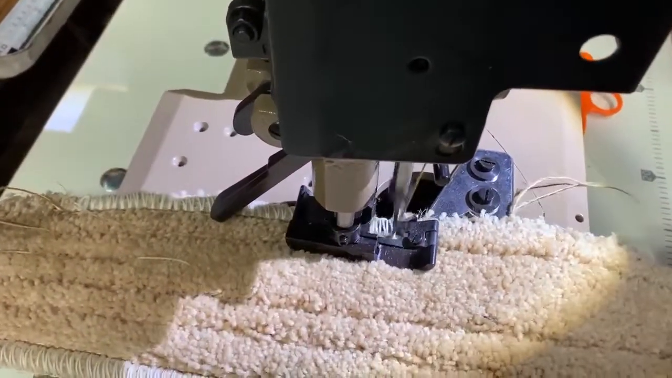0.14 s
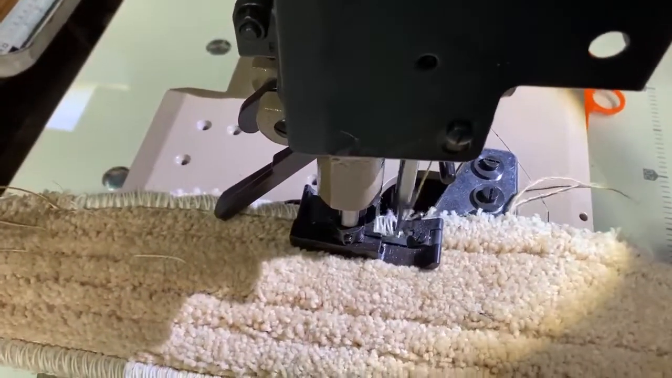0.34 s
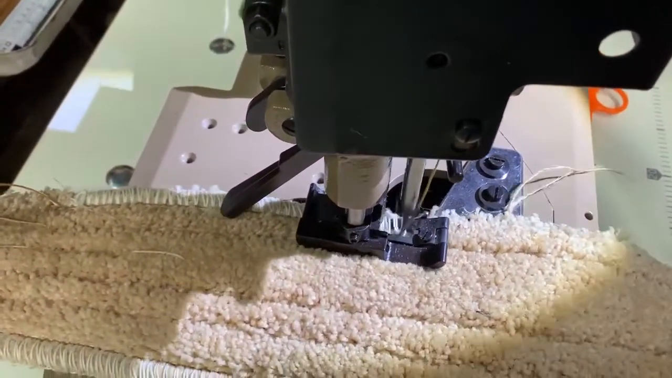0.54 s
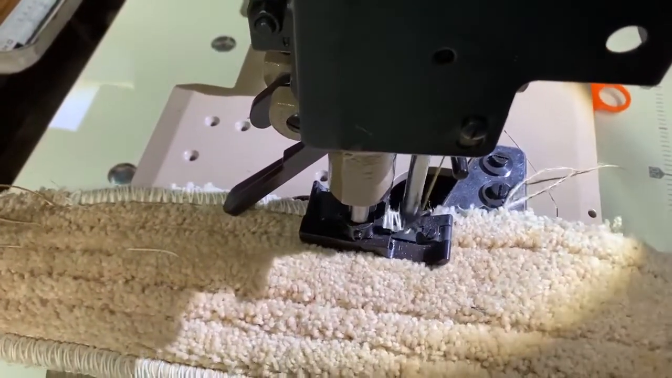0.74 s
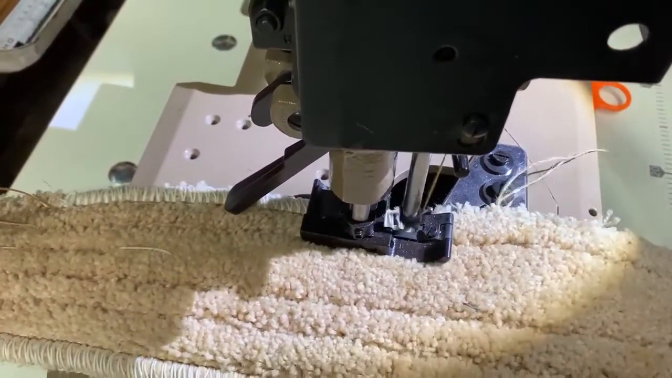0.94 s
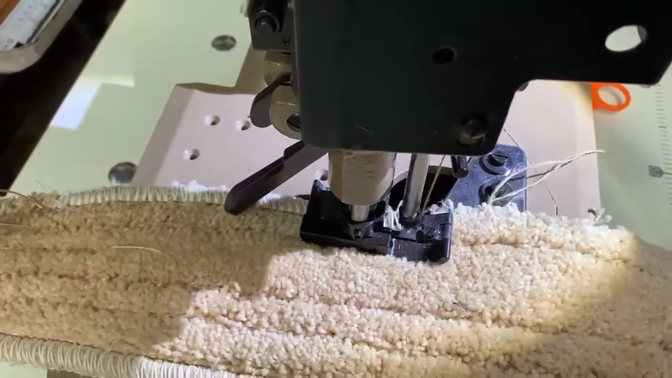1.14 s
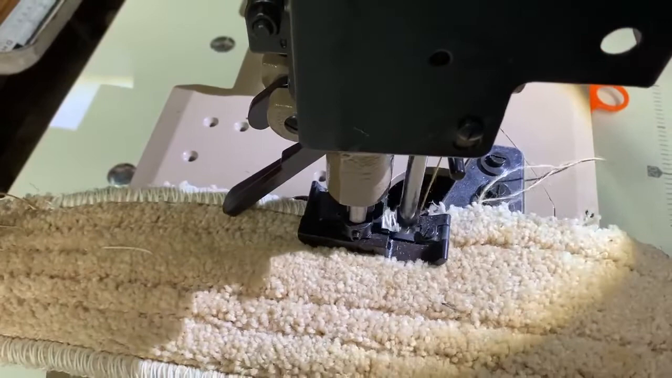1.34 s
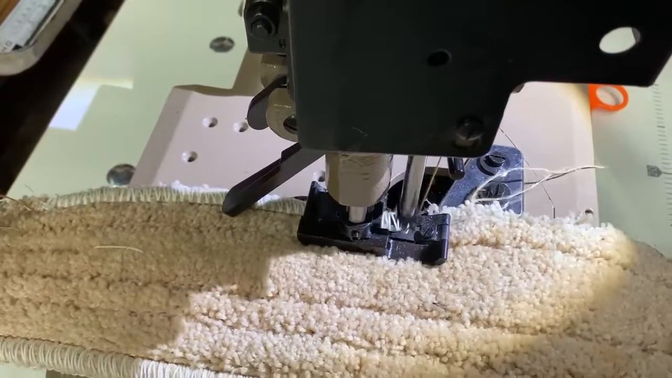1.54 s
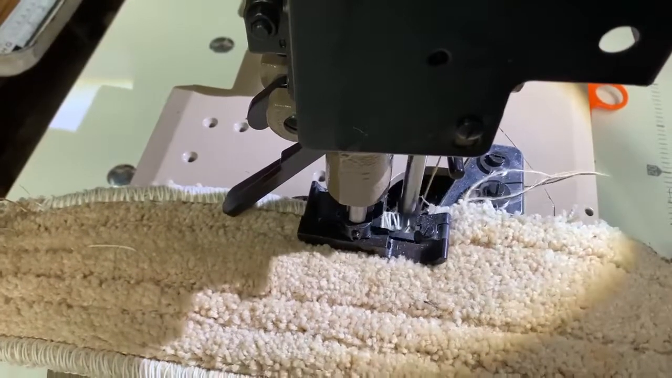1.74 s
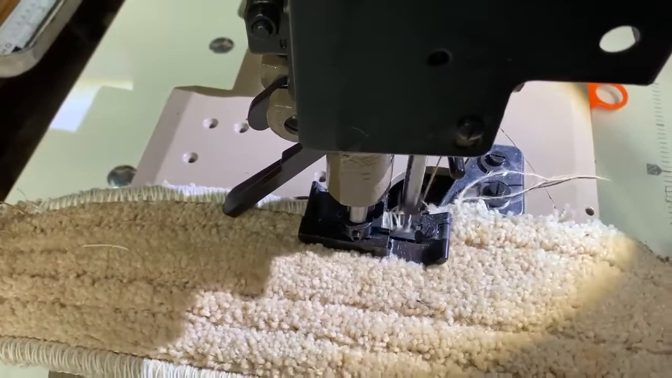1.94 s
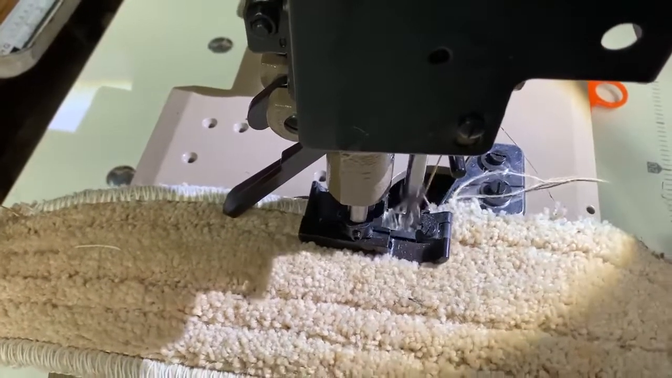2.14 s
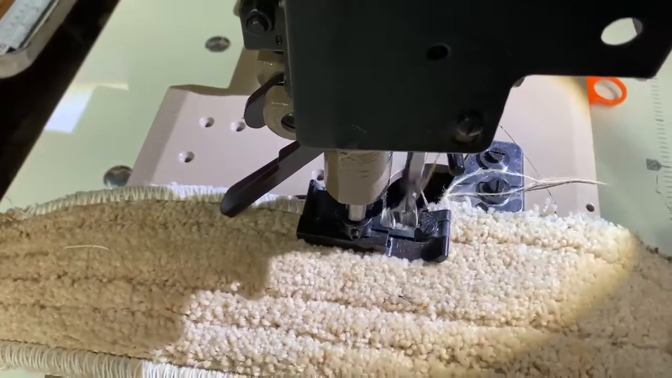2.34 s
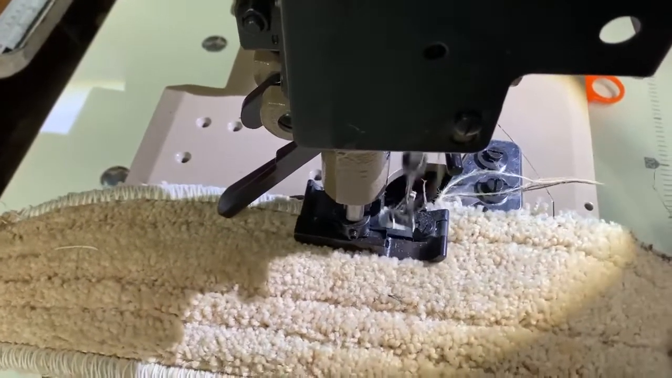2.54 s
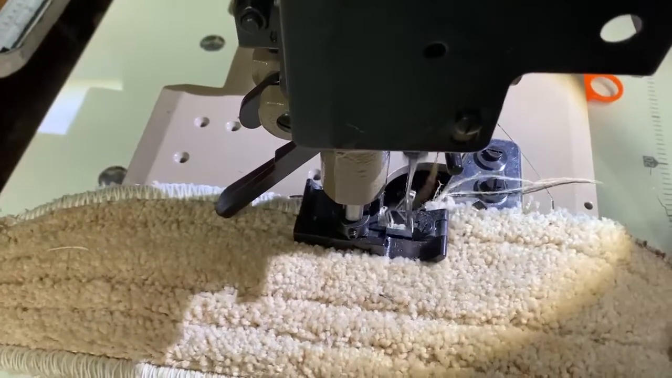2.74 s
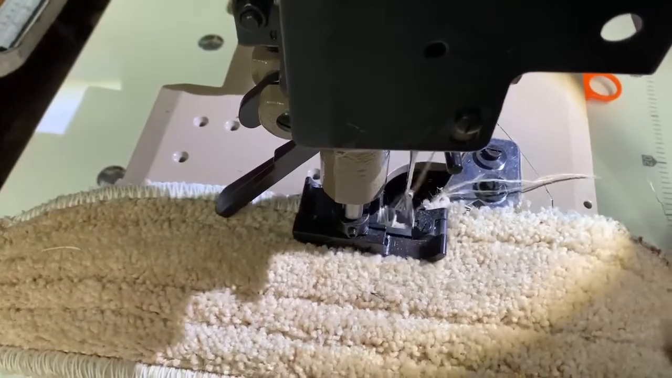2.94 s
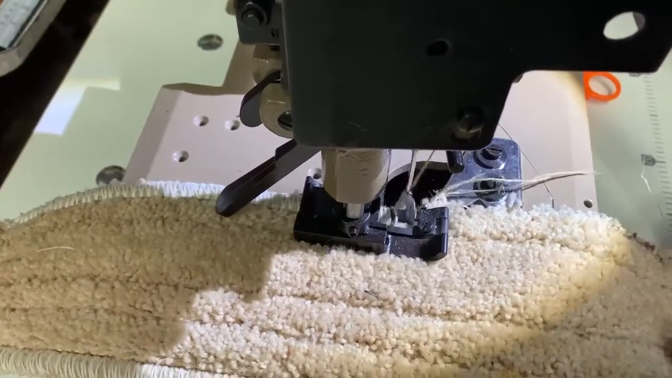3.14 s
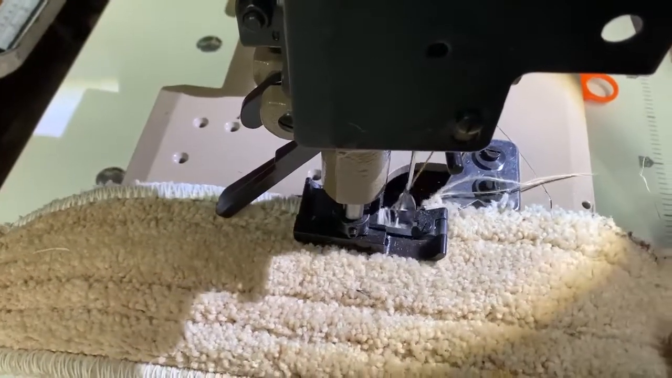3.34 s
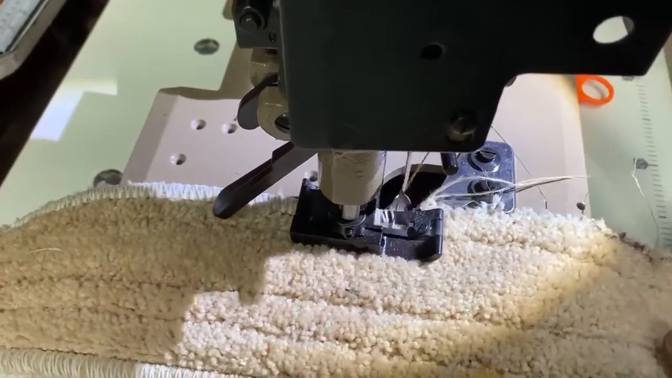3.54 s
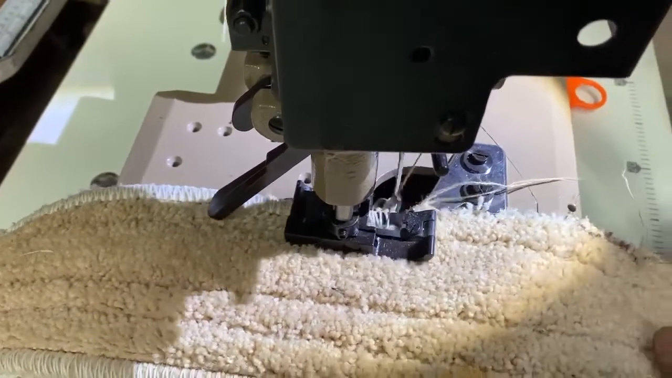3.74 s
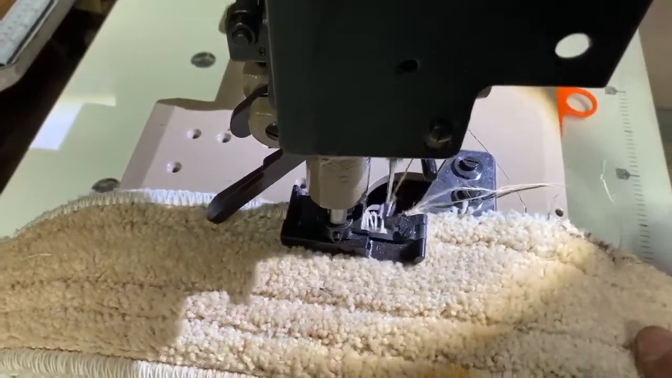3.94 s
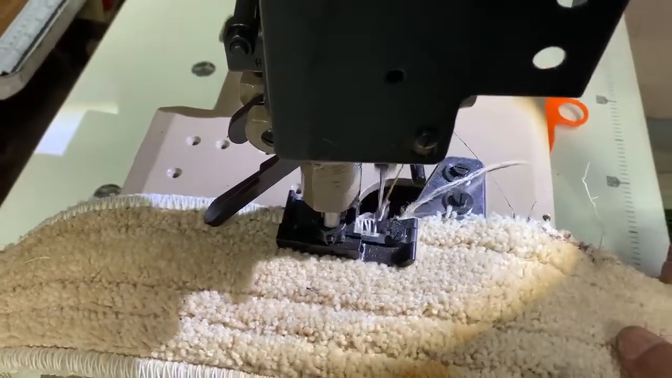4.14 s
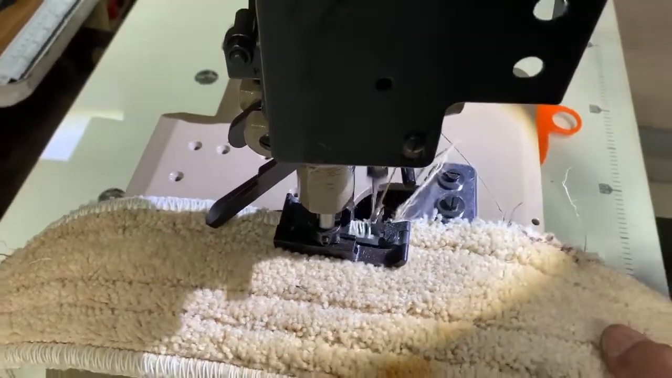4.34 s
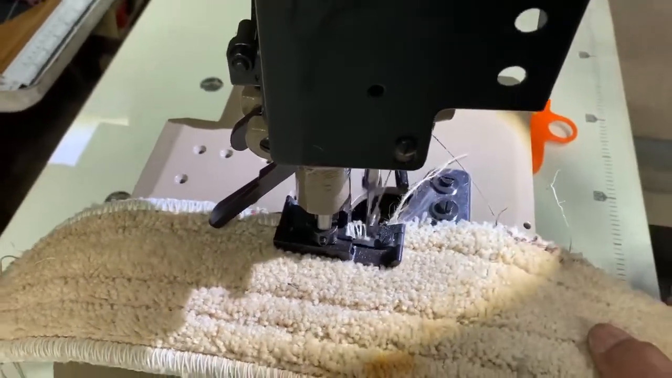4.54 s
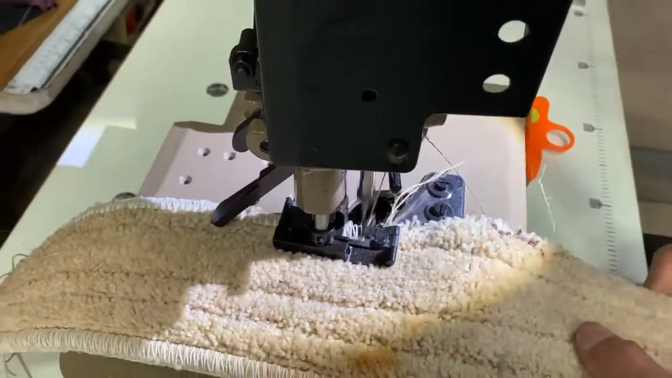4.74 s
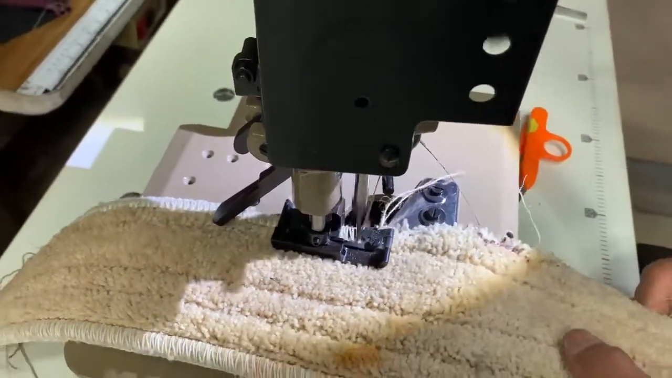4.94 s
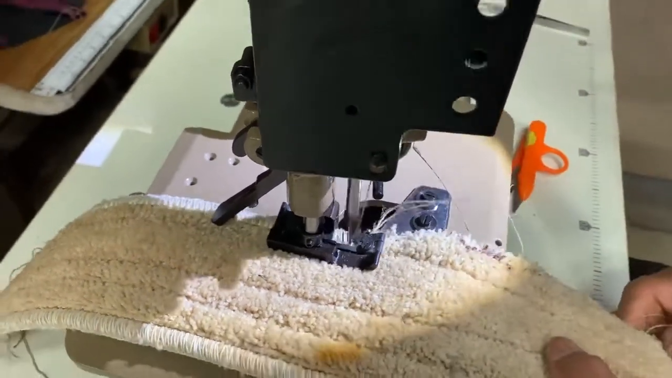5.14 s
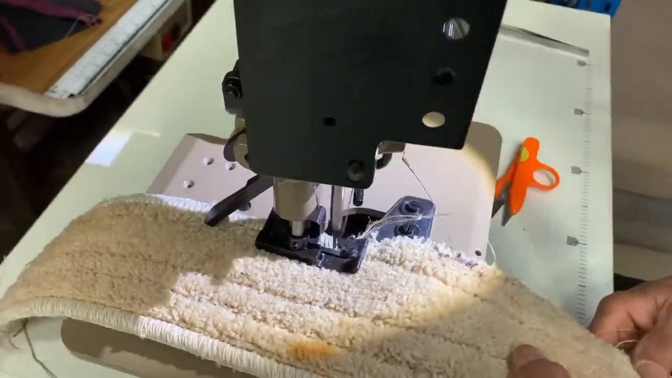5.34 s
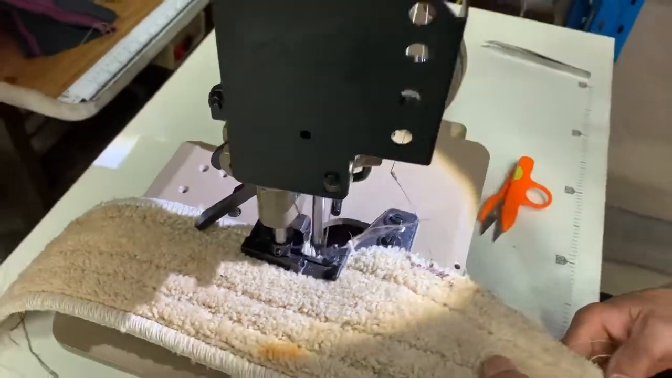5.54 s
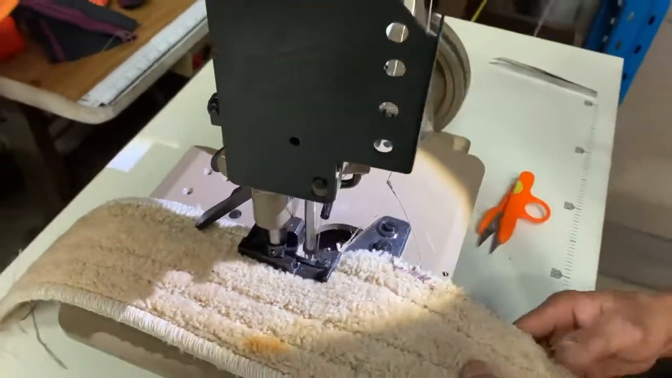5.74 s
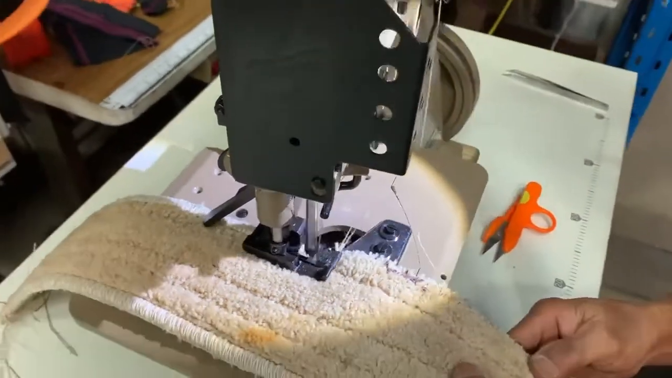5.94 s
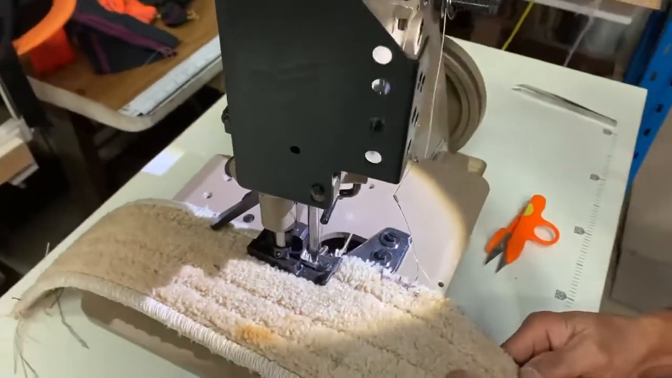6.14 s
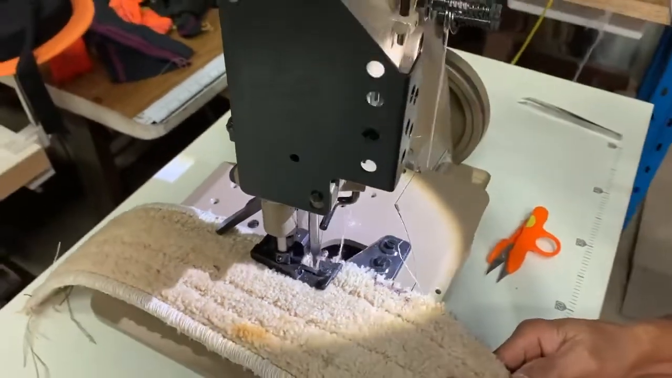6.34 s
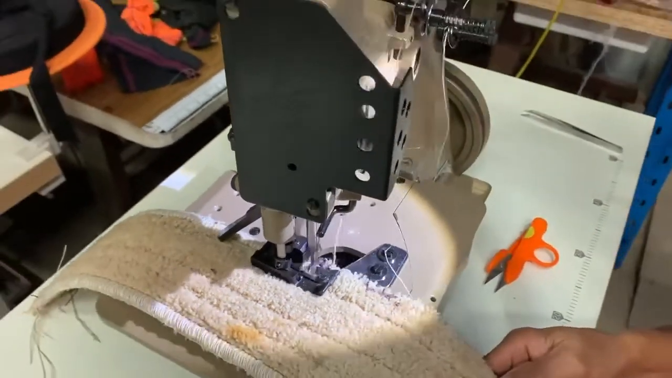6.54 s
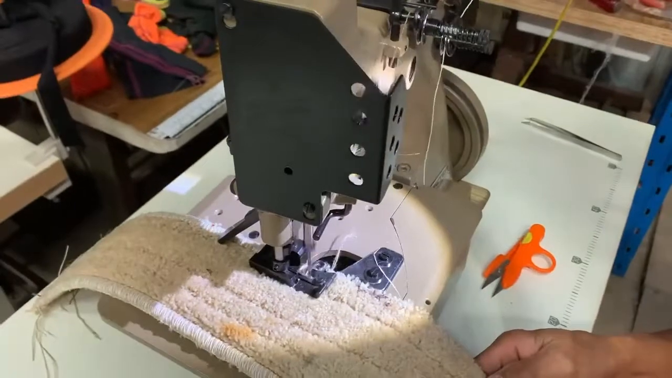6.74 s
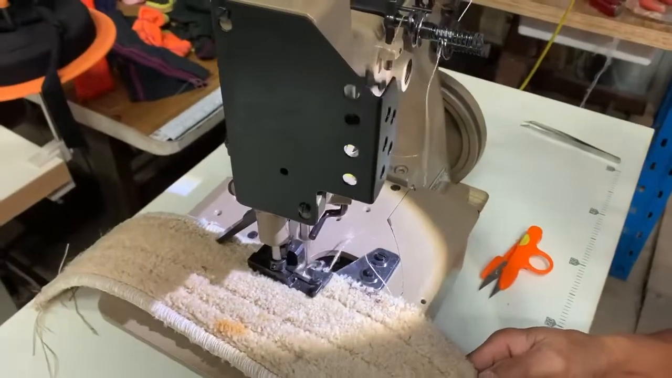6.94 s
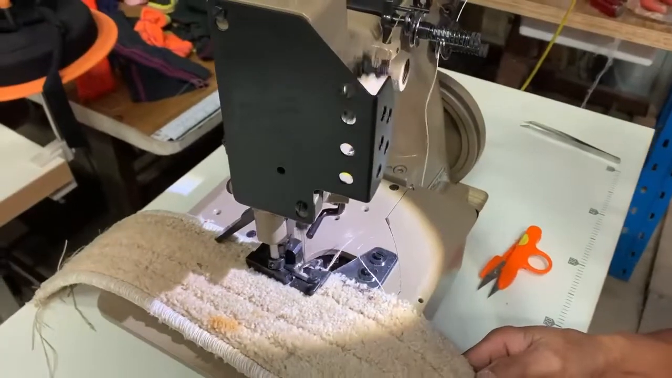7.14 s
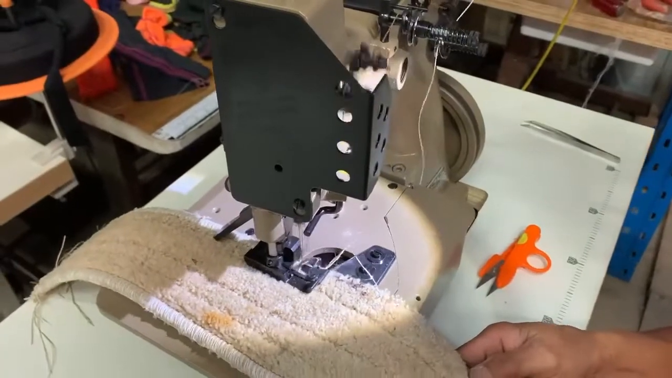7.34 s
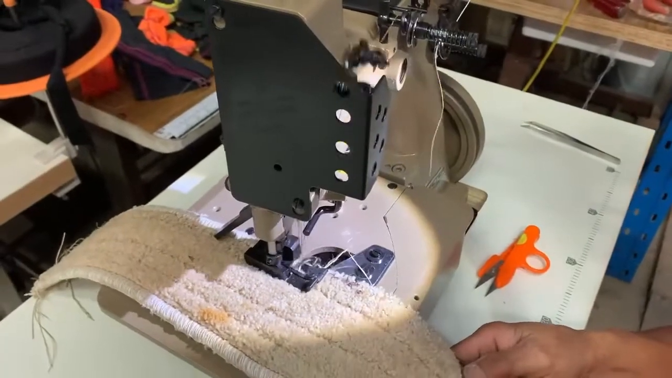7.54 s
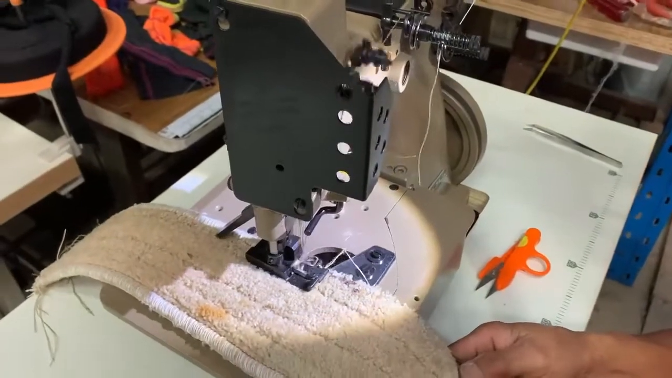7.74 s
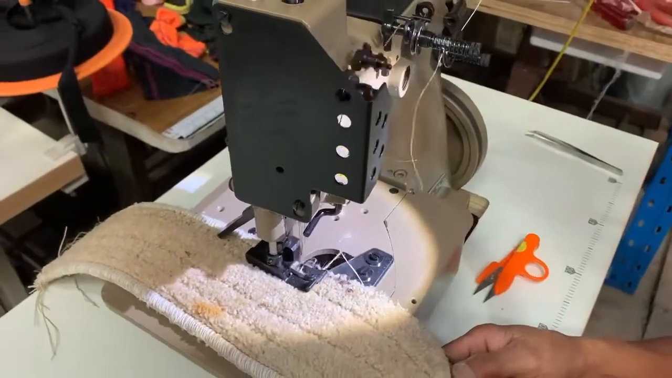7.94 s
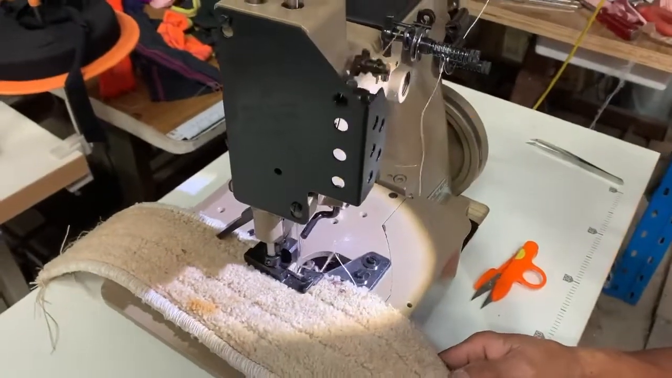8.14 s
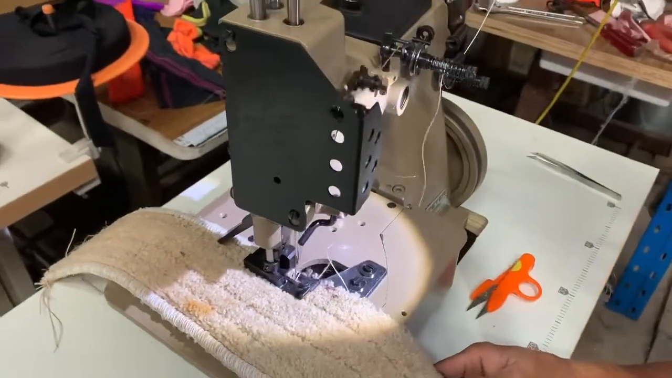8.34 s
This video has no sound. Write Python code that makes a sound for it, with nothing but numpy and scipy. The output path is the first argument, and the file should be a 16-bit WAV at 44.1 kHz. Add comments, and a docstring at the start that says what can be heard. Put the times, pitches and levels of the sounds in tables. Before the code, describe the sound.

Close up, a heavy industrial sewing machine binds a thick carpet at an even pace of nearly five stitches a second. Each stitch is a rounded low boom with a carpet-softened clack, amid joint knocks, steely ticks and raspy thread. A few bright needle clinks come early; later the stitching grows softer and the belt whirr comes forward.

```python
"""A rattling, rasping bed opens, and a heavy sewing machine binds a carpet edge close by, near five stitches a second.
In each stitch the needle drives in, the foot lands with a clack and a boom, and the needle pulls out again.
Booms are rounded swells of decaying sines; clacks, knocks and clinks are impulses ringing tuned modes.
Linkage, thread and backing are shaped noise with tiny slips; a steady sine hums below a noisy belt whirr."""
import sys
import numpy as np
from scipy import signal
from scipy.fft import rfft, irfft
from scipy.io import wavfile

SR = 44100
rng = np.random.default_rng(int(sys.argv[2]) if len(sys.argv) > 2 else 0)


def to_wav(s):
    """Save 16-bit WAV."""
    ch = np.atleast_2d(s).T  # columns
    pcm = np.round(np.clip(ch, -1, 1) * 32767)  # PCM
    wavfile.write(sys.argv[1], SR, pcm.astype(np.int16))


N = 370440

# tonal balance of thread hiss and ticks; only the shape counts: pitch_hz [Hz], density_db [relative dB per Hz]
HISS_SPECTRUM = [(2500, -12), (4200, -27), (5000, 2), (5600, -3.5), (6300, 1), (7300, -2), (8100, 4),
                 (10700, 2), (12000, -3.5)]
# tonal balance of a sharp crack; only the shape counts: pitch_hz [Hz], density_db [relative dB per Hz]
CRACK_SPECTRUM = [(1500, 8.5), (2500, -9), (4000, 9.5), (5500, 4), (8000, 6), (11000, 5)]


def from_db(db):
    """Decibels become an amplitude factor."""
    return 10 ** (np.asarray(db) / 20)


def rms_one(x):
    """Scales a sound to an rms of 1."""
    return x / np.sqrt(np.mean(x ** 2) + 1e-20)


def at_hz(points, hz):
    """Reads a table on a log-frequency axis."""
    known_hz, values = np.transpose(points)
    return np.interp(np.log(np.maximum(hz, 1)), np.log(known_hz), values)


def along(curve):
    """The columns of a slow curve at every sample, each relative to its own mean over time."""
    times_s, *columns = np.transpose(curve)
    levels = [np.interp(np.arange(N) / SR, times_s, column) for column in columns]
    return [level - np.mean(level) for level in levels]


def stereo(mid, side, hz):
    """Two unrelated signals become left and right, as alike as the table says at each pitch."""
    # likeness of the two sides: pitch_hz [Hz], correlation [-1 to 1]
    likeness = [(250, 1), (580, 0.94), (1230, 0.79), (2400, -0.2), (3900, 0.41), (5100, -0.58),
                (6200, 0.49), (7100, -0.89), (8000, 0.11), (9400, 0.019), (10300, 0.78), (11400, -0.87)]
    alike = np.clip(at_hz(likeness, hz), -1, 1)
    return np.sqrt(1 + alike) * mid + np.sqrt(1 - alike) * side * np.array([[1], [-1]])


def lag_right(sound):
    """One sound becomes two sides, the right a moment late."""
    right_lag_s = .00007
    at = np.arange(N)
    right = np.interp(at - right_lag_s * SR, at, sound)
    return np.array([sound, right])


def clicks(times, levels_db):
    """One impulse for each blow."""
    at, out = np.round(times * SR).astype(int), np.zeros(N)
    inside = (at >= 0) & (at < N)
    out[at[inside]] = from_db(levels_db)[inside]
    return out


def ring(force, hz, t60_s):
    """A two-pole resonator: a unit impulse sets a sine of height 1 ringing."""
    radius, turn = from_db(-60 / (t60_s * SR)), 2 * np.pi * hz / SR
    poles = [1, -2 * radius * np.cos(turn), radius * radius]
    return signal.lfilter([0, np.sin(turn)], poles, force + 1e-18)


def fade(force, decay_s):
    """Each impulse becomes an envelope that dies away exponentially."""
    return signal.lfilter([1], [1, -np.exp(-1 / (decay_s * SR))], force + 1e-18)


def strike(times, levels_db, modes, scatter_db):
    """Blows ring every mode, with scattered strengths; the sides differ where the likeness is low."""
    out = 0
    for k, (hz, mode_db, t60_s) in enumerate(modes):
        chance = rng.uniform(-1.7, 1.7, (len(times), 2))
        force = clicks(times, levels_db + mode_db + scatter_db * chance[:, 0])
        sideways = clicks(times + abs(chance[:, 1]) / hz, levels_db + mode_db)
        polarity = (-1) ** k
        out = out + polarity * ring(stereo(force, sideways, hz), hz, t60_s) / np.sqrt(2)
    return signal.sosfilt(signal.butter(2, 220, "high", fs=SR, output="sos"), out)


def friction(spectrum, grains_per_s, grain_db):
    """Smooth rubbing plus tiny separate slips, in stereo; rms 1."""
    slips = (rng.random((2, N)) < grains_per_s / SR) * rng.standard_normal((2, N))
    rubbing = rng.standard_normal((2, N)) + from_db(grain_db) * rms_one(slips)
    mid, side = rfft(rubbing)
    hz = np.arange(len(mid)) * SR / N
    coloured = stereo(mid, side, hz) * from_db(at_hz(spectrum, hz))
    return rms_one(irfft(coloured, N))


def chatter(signals, rough_db, flutter_hz):
    """Surfaces stick and slip, so the rubbing comes in quick uneven spurts; rms 1."""
    lowpass = signal.butter(2, flutter_hz, fs=SR, output="sos")
    flutter = signal.sosfilt(lowpass, rng.standard_normal(N))
    return rms_one(signals * from_db(rough_db * rms_one(flutter)))


def clatter(taps_per_s, t60_s):
    """Loose steel parts are tapped at random, each ringing briefly at its own pitch; rms 1."""
    # small steel parts round the needle: pitch_hz [Hz], level_db [relative dB]
    steel_parts = [(1680, 3.5), (1830, 3), (2000, 5.5), (2160, 3), (2400, 2), (2640, 2), (2790, 2),
                   (3020, -1.5), (3290, -2.5), (3480, -7), (3930, -5.5), (4150, -4), (4480, -3), (4950, -3),
                   (6200, -18.5)]
    out = 0
    count = int(taps_per_s * N / SR)
    for hz, mode_db in steel_parts:
        mid, side = [clicks(rng.uniform(0, N / SR, count), rng.uniform(-16, 0, count)) for _ in range(2)]
        out = out + from_db(mode_db) * ring(stereo(mid, side, hz), hz, t60_s)
    return rms_one(out)


def swell(times, levels_db, hz, rise_s, glide_hz_per_s=0):
    """Each shove makes one rounded lump of a sine; a glide bends it up through hz at the peak."""
    roundness = 2.89   # how closely the fall mirrors the rise
    t, out = np.arange(SR // 6) / SR, np.zeros(N + SR)
    shape = (t / rise_s * np.exp(1 - t / rise_s)) ** roundness
    starts = np.maximum(times * SR, 0).astype(int)
    for start, gain, pitch in zip(starts, from_db(levels_db), hz * np.ones(len(times))):
        cycles = t * (pitch + glide_hz_per_s * (t / 2 - rise_s))
        out[start:start + len(t)] += gain * shape * np.sin(2 * np.pi * cycles)
    return out[:N]


def motor():
    """The motor's hum is a steady low sine; the belt's whirr is shaped friction following a slow fader."""
    # fader of the belt drive: time_s [s], level_db [dB rms]
    belt_level = [(0, -47), (4.8, -49), (6.2, -41), (8.4, -40.5)]
    # tonal balance of its whirr, only the shape counts: pitch_hz [Hz], density_db [relative dB per Hz]
    whirr_spectrum = [(200, -3.5), (340, 4), (430, 4), (490, -1), (560, -19), (1100, -7), (1500, -10.5),
                      (2200, -10), (2800, -77), (8000, -48)]
    hum_hz = 61.3
    t = np.arange(N) / SR
    hum = from_db(-56.0) * np.sin(2 * np.pi * hum_hz * t)
    belt_db = np.interp(t, *np.transpose(belt_level))
    return hum + from_db(belt_db) * friction(whirr_spectrum, grains_per_s=320, grain_db=-3.5)


def linkage(landings, effort_db, turn_db):
    """Joints knock at fixed points of the turn; bearings rattle and keep the arm droning."""
    # knocks in every stitch: offset_s [s from the foot's landing], level_db [relative dB]
    joint_knocks = [(-.065, -35), (-.059, -37), (-.046, -38), (-.012, -42), (.072, -35), (.087, -37),
                    (0.121, -37)]
    # modes of the machine casting: pitch_hz [Hz], level_db [relative dB], t60_s [s]
    casting_modes = [(284, 10, 0.078), (490, 4.5, 0.015), (587, -2, 0.1), (637.4, -4.5, 0.13),
                     (723, 1, 0.084), (895, -10, 0.34), (975, -6, 0.077), (1610, -32, 0.03),
                     (1690, -4, 0.019), (1850, -8, 0.06), (2090, -35, 0.072)]
    # tonal balance of the rattle, only the shape counts: pitch_hz [Hz], density_db [relative dB per Hz]
    rattle_spectrum = [(25, -25), (60, 9.5), (110, -7.5), (190, 11), (380, -12), (520, -0.5), (900, -1.5),
                       (1150, -8), (1500, -8), (1900, -14), (2400, -59), (4000, -22), (11000, -68)]
    offsets, knock_db = np.transpose(joint_knocks)
    jitter_s = rng.normal(0, 0.00102, (len(landings), len(offsets)))
    times = (landings[:, None] + offsets + jitter_s).ravel()
    knocks = strike(times, np.tile(knock_db, len(landings)) - 7.0, casting_modes, scatter_db=4.5)
    rattle = from_db(turn_db - 46.0) * friction(rattle_spectrum, grains_per_s=500, grain_db=-4.0)
    arm = ring(ring(rng.standard_normal(N), hz=246.7, t60_s=0.2), hz=286.6, t60_s=0.043)
    drone = from_db(turn_db - 36.5) * rms_one(arm)
    load_db = effort_db - np.mean(effort_db)
    # knocks grow faster with load than the rubbing does
    return from_db(2.8 * load_db) * knocks + from_db(load_db) * (rattle + drone)


def stroke_levels(landings, spread_db):
    """Rasp, hiss and linkage in relative dB: strokes of varying strength swell above the slack level."""
    # strokes drawing the thread through in every stitch: offset_s [s from the foot's landing],
    # spread_s [s, standard deviation], rasp_db, hiss_db, linkage_db [relative dB, added as power]
    thread_strokes = [(-.054, 0.0038, 3, 3, 6), (-.038, 0.012, 6.5, 7.5, 4), (-.018, 0.0078, 5, 3.5, 2),
                      (0.018, 0.0067, -4.5, 5.5, -3), (0.05, 0.022, 8.5, 5, -2.5), (.079, 0.012, 9, -1, 3),
                      (0.097, 0.011, 0.5, -15, -6.5)]
    slack_db = [[3], [2], [4.5]]   # rasp, hiss, linkage between the strokes
    power = from_db(slack_db) ** 2
    for offset_s, width_s, *levels_db in thread_strokes:
        force = clicks(landings + offset_s, spread_db * rng.uniform(-1.02, 1, len(landings)))
        bump = signal.windows.gaussian(SR // 8, width_s * SR)
        stroke = signal.oaconvolve(force ** 2, bump, "same")
        power = power + from_db(levels_db)[:, None] ** 2 * stroke
    return 10 * np.log10(power)


def thread(rasp_db, hiss_db):
    """Thread rasps through the pile in stick-slip spurts and shakes its guides; a few fibres snap."""
    # tonal balance of the rasp, only the shape counts: pitch_hz [Hz], density_db [relative dB per Hz]
    rasp_spectrum = [(1200, 10.5), (2000, 2), (2750, 8), (3100, 0), (4000, 5.5), (4900, -34), (5700, -45),
                     (11000, -23)]
    # snapping fibres: time_s [s], level_db [relative dB]
    fibre_snaps = [(0.248, -27.5), (0.63, -29), (1.082, -27), (1.707, -31), (2.545, -28.5), (3.057, -28.5),
                   (5.3792, -30), (5.387, -27), (5.469, -28), (5.679, -32), (5.798, -31), (6.229, -33),
                   (6.4361, -36), (6.6451, -34), (6.8551, -44), (7.984, -28.5)]
    rub = chatter(friction(rasp_spectrum, grains_per_s=1200, grain_db=-32), rough_db=-3.0, flutter_hz=100)
    guides = clatter(taps_per_s=45, t60_s=0.06)
    rasp = from_db(rasp_db) * (from_db(-4.5) * rub + guides)
    airy = chatter(friction(HISS_SPECTRUM, grains_per_s=2500, grain_db=-5.5), rough_db=1.74, flutter_hz=89.4)
    hiss = from_db(hiss_db - 56.5) * airy
    snap_s, snap_db = np.transpose(fibre_snaps)
    snap_envelope = fade(clicks(snap_s, snap_db - 5.0), decay_s=0.0095)
    return rasp + hiss + snap_envelope * friction(CRACK_SPECTRUM, grains_per_s=2600, grain_db=-3)


def feed(landings):
    """The feed shoves the carpet on with soft low swells near fixed points of the turn."""
    # thumps in every stitch: offset_s [s from the foot's landing], level_db [relative dB], pitch_hz [Hz]
    feed_thumps = [(-.064, -23, 281), (.078, -33.5, 250), (.116, -26, 270)]
    offsets, thump_db, hz = np.transpose(feed_thumps)
    late, force = rng.uniform(-1, 1, (2, len(landings), len(offsets)))
    times = (landings[:, None] + offsets + 0.0023 * late).ravel()
    return swell(times, (thump_db + 4 * force).ravel(), np.tile(hz, len(landings)), rise_s=0.0093)


def ticking(landings):
    """Looper, feed and take-up tick near fixed points of the turn, each with a short steely rattle."""
    # ticks in every stitch: offset_s [s from the foot's landing], tick_db, rattle_db [relative dB]
    turn_ticks = [(-.059, -72, -43), (-.05, -45.5, -56.5), (-.043, -47, -45), (.044, -54.5, -45),
                  (0.069, -44, -42.5), (0.11, -54, -55)]
    offsets, tick_db, rattle_db = np.transpose(turn_ticks)
    late, force = rng.uniform(-1, 1, (2, len(landings), len(offsets)))
    times = (landings[:, None] + offsets + 0.0015 * late).ravel()
    ticks, rattles = [fade(clicks(times, (db + 4.7 * force).ravel()), decay_s=0.011)
                      for db in (tick_db, rattle_db)]
    sharp = ticks * friction(HISS_SPECTRUM, grains_per_s=1500, grain_db=3)
    return sharp + rattles * clatter(taps_per_s=400, t60_s=0.031)


def needle_bar(landings, lead_s, in_db, delay_s, out_db, arm_hz):
    """The arm booms as the needle is forced into the backing and pulled out; the stand rocks with it."""
    push_rise_s, pull_rise_s = 0.01868, 0.023   # time to the top of each boom
    pushes = landings - lead_s - push_rise_s
    pulls = landings + delay_s - pull_rise_s
    arm = swell(pushes, in_db, arm_hz, push_rise_s) + swell(pulls, out_db, arm_hz, pull_rise_s)
    return arm + swell(pushes, in_db - 27.5, hz=58.0, rise_s=0.023)


def backing(landings, crunch_db):
    """The stiff backing crunches while the needle is deep in it: rough friction under a short hump."""
    # tonal balance of the crunch, only the shape counts: pitch_hz [Hz], density_db [relative dB per Hz]
    crunch_spectrum = [(1000, 13.5), (1750, 12), (2100, 19), (2450, 5), (2750, 8.5), (3100, -3), (3350, 13),
                       (4400, -7), (5500, -27), (11000, -25)]
    hump = signal.windows.hann(int(.075 * SR))
    squeeze = signal.fftconvolve(clicks(landings + 0.0032, crunch_db + 5.5), hump, "same")
    crunch = friction(crunch_spectrum, grains_per_s=770, grain_db=-3.0)
    return squeeze * chatter(crunch, rough_db=0.0, flutter_hz=119.15)


def presser_foot(landings, clack_db, boom_db, boom_hz):
    """The foot clacks down and bounces; its weight raises a short boom, and the table top hums on."""
    # table top, neighbouring modes swing against each other: pitch_hz [Hz], level_db [relative dB], t60_s [s]
    table_modes = [(186.4, -18, 0.2), (250, -22, 0.31)]
    # modes of the presser foot: pitch_hz [Hz], level_db [relative dB], t60_s [s]
    foot_modes = [(524, -9.5, 0.19), (743, -3, 0.057), (890, -1, 0.016), (988, 2, 0.056),
                  (1040, -28, 0.019), (1243, -8.5, 0.14), (1707, -10, 0.16)]
    # touches as the foot lands: delay_s [nominal s after landing], level_db [relative dB]
    foot_bounces = [(0, 0), (.004, -5), (.008, -9), (.015, -15)]
    grit_spectrum = [(250, -26), (450, -4), (700, 0), (1000, 10.5), (1280, 6.0), (1500, -17), (4000, -39)]
    pile_cut_hz = 1550   # the carpet softens the foot's contact
    hum = sum((-1) ** k * ring(clicks(landings + 0.004, boom_db + mode_db), hz, t60_s)
              for k, (hz, mode_db, t60_s) in enumerate(table_modes))
    # the boom rises in pitch as the foot presses harder
    boom = swell(landings, boom_db, boom_hz, rise_s=0.013, glide_hz_per_s=700) + hum
    delay_s, loss_db = np.transpose(foot_bounces)
    touches = landings[:, None] + delay_s * rng.uniform(0.932, 1.03, (len(landings), len(delay_s)))
    touch_db = clack_db[:, None] + loss_db
    clack = strike(touches.ravel(), touch_db.ravel(), foot_modes, scatter_db=0.0)
    grit = friction(grit_spectrum, grains_per_s=470, grain_db=4)
    grinding = fade(clicks(landings, clack_db + .5), decay_s=0.0069) * grit
    soften = signal.butter(4, pile_cut_hz, fs=SR, output="sos")
    return signal.sosfilt(soften, lag_right(boom) + clack + grinding)


def needle_clinks():
    """The needle cracks on metal, bounces once and rings; nearby parts rattle, as when the thread catches."""
    # needle grazing metal: time_s [s], ring_db, crack_db [relative dB]
    metal_clinks = [(0.1262, -17.5, -13.5), (0.3353, -23.5, -18), (.5456, -21, -17.5), (1.1712, -22, -28),
                    (1.176, -25, -31)]
    # thread catching and shaking its guides: time_s [s], level_db [dB]
    thread_catches = [(1.697, -35.5), (2.533, -42), (3.51, -34), (3.65, -35.5), (3.717, -35.5),
                      (3.811, -37), (4.311, -39), (4.632, -34.5), (5.349, -33), (5.68, -46), (6.948, -38)]
    # modes of the needle and its bar: pitch_hz [Hz], level_db [relative dB], t60_s [s]
    needle_modes = [(1890, -13, 0.023), (2005, -8, 0.047), (2750, -12.5, 0.023), (3246, -4.5, 0.039),
                    (3480, -5.5, 0.047), (3870, -21, 0.02), (6040, -14, 0.034), (8110, -13, 0.061),
                    (9370, -15.5, 0.05)]
    times, ring_db, crack_db = np.transpose(metal_clinks)
    first, bounce = times + 0.00044, times + 0.0034
    blows = clicks(first, ring_db) + clicks(bounce, ring_db - 4.5)
    rings = sum((-1) ** k * ring(blows * from_db(db), hz, t60_s)
                for k, (hz, db, t60_s) in enumerate(needle_modes))
    rings = signal.sosfilt(signal.butter(4, 1500, "high", fs=SR, output="sos"), rings)
    contacts = clicks(first, crack_db) + clicks(bounce, crack_db - 10)
    crack = fade(contacts, decay_s=0.0016) * friction(CRACK_SPECTRUM, grains_per_s=8000, grain_db=-8)
    clink_shakes = fade(clicks(times, ring_db - 16), decay_s=0.031)
    catch_shakes = fade(clicks(*np.transpose(thread_catches)), decay_s=0.015)
    return lag_right(rings) + crack + (clink_shakes + catch_shakes) * clatter(taps_per_s=230, t60_s=0.0091)


def scene():
    """Every stitch drives the blows and strokes; slow faders ride the running layers over the motor."""
    # stitches: landing_s [s], clack_db, boom_db [relative dB], boom_hz [Hz at the peak],
    # lead_s [s from push peak to landing], in_db [relative dB], delay_s [s from landing to pull peak],
    # out_db [relative dB], arm_hz [Hz], crunch_db [relative dB]
    stitches = [(0.087, -28, -5.5, 277, 0.027, -12.5, 0.058, -8, 251, -44.5),
                (0.2967, -29, -6.5, 274, 0.011, -38, 0.059, -16, 261, -47),
                (0.5044, -28.0, -9, 272, 0.0161, -16.5, 0.058, -11.5, 253.4, -52),
                (0.7125, -26.5, -7.5, 275, 0.0196, -20.5, 0.0525, -41, 249.0, -39),
                (0.9223, -31.5, -12.5, 262.0, 0.024, -15, 0.0536, -13, 252, -54),
                (1.1304, -31.5, -8.5, 268.4, 0.026, -8.0, 0.0528, -12, 247.5, -44.5),
                (1.3387, -28, -11, 272.5, 0.023, -11.0, 0.048, -18.5, 262, -56),
                (1.547, -29.5, -9.5, 273, 0.0119, -14, 0.073, -31, 252.4, -50),
                (1.7559, -29, -8.5, 275, 0.0231, -11.5, 0.0494, -29, 258, -44),
                (1.964, -39, -14, 269, 0.023, -22, 0.0444, -34, 270, -52),
                (2.173, -54, -14, 288, 0.027, -11.5, 0.042, -24, 255.5, -45),
                (2.38, -28.5, -8, 268, 0.0177, -26, 0.067, -16.0, 246, -43),
                (2.592, -29, -10.5, 274, 0.0115, -19, 0.064, -40, 273.4, -46),
                (2.8033, -27, -7, 274, 0.024, -9.5, 0.0446, -20, 248, -43),
                (3.0155, -31.5, -13.5, 265.4, 0.022, -9.5, 0.052, -17.5, 252.4, -42),
                (3.225, -30.5, -10.5, 280, 0.025, -11.0, 0.0445, -22.0, 254.2, -42),
                (3.4347, -42, -12.5, 269.4, 0.0179, -17.5, 0.047, -25.5, 259, -48),
                (3.6439, -29.5, -10.5, 273, 0.0184, -10.5, 0.0482, -14.0, 249.7, -40),
                (3.8534, -27.0, -7, 271, 0.027, -7.5, 0.065, -16, 253, -42.0),
                (4.0621, -51, -12.5, 273, 0.022, -23, 0.069, -17.5, 254.5, -52),
                (4.2705, -29.0, -10, 274, 0.028, -12.5, 0.0492, -20, 256.6, -44.5),
                (4.478, -30, -14, 282, 0.027, -5.5, 0.0568, -24, 252.6, -45),
                (4.686, -33.5, -12.5, 266.0, 0.021, -7.5, 0.049, -22.5, 248.7, -55),
                (4.8936, -28, -9.5, 271.0, 0.023, -29, 0.066, -21.5, 251.6, -43.5),
                (5.1018, -30.0, -11, 272, 0.018, -18.5, 0.061, -19.5, 254.0, -49),
                (5.3094, -32, -10, 258, 0.019, -11.5, 0.0462, -22.5, 261.6, -51),
                (5.5183, -29.5, -14, 283, 0.0253, -11, 0.042, -17.5, 253, -49),
                (5.731, -28, -9.5, 278, 0.027, -12.5, 0.049, -17, 251.5, -41.5),
                (5.9412, -31, -10.0, 273, 0.024, -15, 0.0446, -19.5, 251, -52),
                (6.1549, -31.5, -10, 266.0, 0.0184, -25, 0.054, -17, 254.6, -49),
                (6.367, -35.5, -16.5, 275.5, 0.019, -18.5, 0.0497, -21.5, 273.5, -47),
                (6.5766, -38, -18.0, 269, 0.021, -17, 0.063, -21, 246.2, -61),
                (6.786, -32.0, -10, 272, 0.018, -14.5, 0.044, -16, 263.6, -44.5),
                (6.996, -30.5, -14.0, 275, 0.022, -12, 0.0509, -34, 265, -45.5),
                (7.206, -36, -13, 275, 0.0249, -16.5, 0.06, -23.5, 252.5, -50),
                (7.416, -35.0, -16, 258.4, 0.033, -25.5, 0.0452, -26.5, 256, -58.0),
                (7.6238, -36.5, -14, 268, 0.023, -16.5, 0.054, -24, 258, -68),
                (7.829, -34, -17.5, 278, 0.013, -16, 0.055, -29, 252.6, -61),
                (8.0362, -32.0, -14.5, 282, 0.03, -17, 0.061, -19.5, 254.0, -51),
                (8.2444, -49.5, -18.5, 289, 0.0179, -17.5, 0.0522, -23, 261.7, -63)]
    # running level, only the movement about the mean counts: time_s [s], linkage_db, rasp_db [relative dB]
    running_level = [(0, -36.5, -52), (2.2, -36.5, -52), (3.7, -36.5, -51), (5.5, -38.5, -52),
                     (6.8, -40, -55.5), (7.35, -40.5, -57), (8.4, -41, -55)]
    (landings, clack_db, boom_db, boom_hz, lead_s,
     in_db, delay_s, out_db, arm_hz, crunch_db) = np.transpose(stitches)
    linkage_db, pile_db = along(running_level)
    rasp_db, hiss_db, rattle_db = stroke_levels(landings, spread_db=4)
    booms = needle_bar(landings, lead_s, in_db, delay_s, out_db, arm_hz)
    booms = booms + from_db(linkage_db) * feed(landings)
    blows = lag_right(booms) + presser_foot(landings, clack_db, boom_db, boom_hz) + needle_clinks()
    rubbing = linkage(landings, linkage_db, rattle_db) + backing(landings, crunch_db)
    sewing = thread(pile_db + rasp_db - 54.5, hiss_db + .48 * pile_db)
    sewing = sewing + from_db(.7 * pile_db) * ticking(landings)
    balance = from_db([[-.3], [.3]])   # slightly to the right
    return (blows + sewing) * balance + rubbing + motor()


def record(dry):
    """A steep elliptic lowpass cuts the top."""
    cutoff_hz = 11500
    return signal.sosfilt(signal.ellip(8, .3, 80, cutoff_hz, fs=SR, output="sos"), dry)


dry = scene()
out = record(dry)
to_wav(out)
```